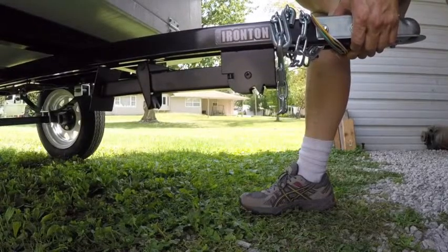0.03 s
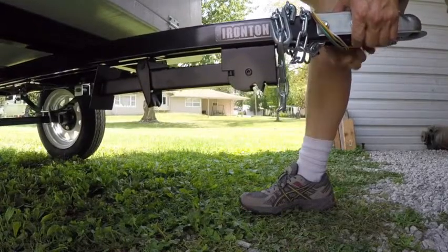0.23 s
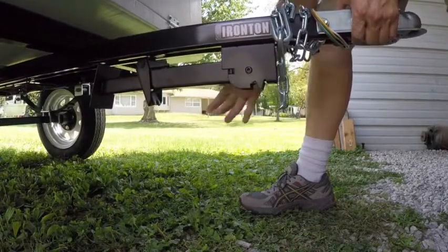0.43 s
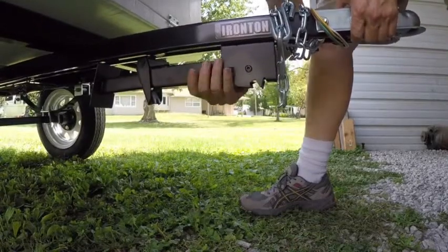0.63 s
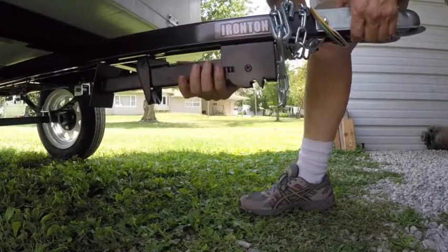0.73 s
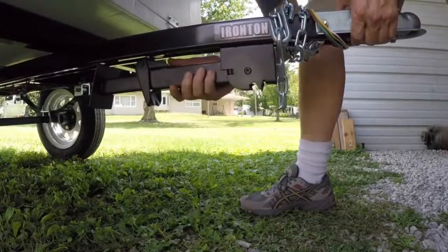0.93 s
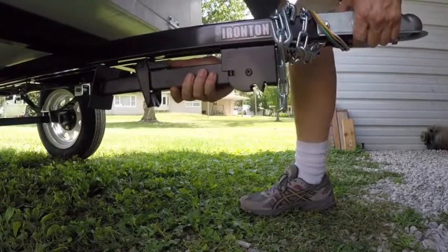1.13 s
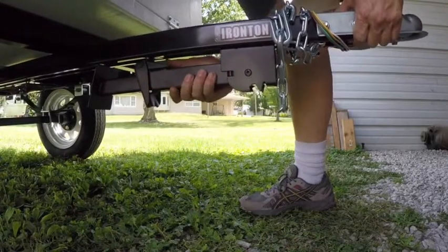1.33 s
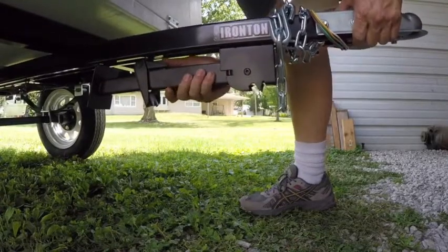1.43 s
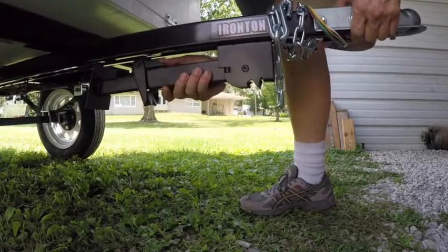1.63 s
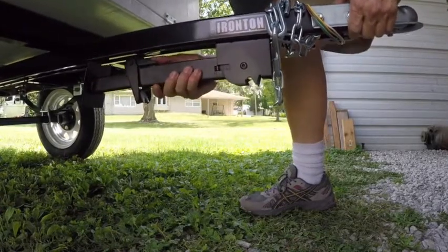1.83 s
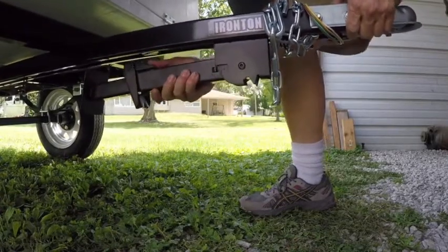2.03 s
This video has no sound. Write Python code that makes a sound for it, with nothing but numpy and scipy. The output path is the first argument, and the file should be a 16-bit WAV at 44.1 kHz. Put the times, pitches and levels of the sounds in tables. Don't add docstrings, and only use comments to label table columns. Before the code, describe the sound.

A sharp metal clank of a folding trailer jack comes at about 1.83 s: several blows within a tenth of a second, bright and rattling, with a deep frame boom and brief ringing to the end. Before it, quiet outdoor air, low traffic rumble, pulsing cicadas and thin high chirps; soft hand rubs, tiny steel ticks and dull nudges, mostly from 1.0 to 1.6 s. Close microphone.

```python
import sys
import numpy as np
from scipy import signal
from scipy.fft import rfft, irfft
from scipy.io import wavfile
from scipy.ndimage import uniform_filter1d

SR = 44100
rng = np.random.default_rng(int(sys.argv[2]) if len(sys.argv) > 2 else 0)


def generate_wav(sig):
    pcm = np.round(np.clip(np.atleast_2d(sig).T, -1, 1) * 32767).astype(np.int16)
    wavfile.write(sys.argv[1], SR, pcm)


def gain_from_db(level_db):
    decades = np.asarray(level_db, float) / 20
    return 10 ** decades


N = 91772


def level(x, db):
    return x * gain_from_db(db) / np.sqrt(np.mean(x ** 2))


def colour(x, points, tilt_db=0.):
    octave = np.log2(np.maximum(np.fft.rfftfreq(len(x), 1 / SR), 1))
    hz, db = np.array(points, float).T
    gain_db = np.interp(octave, np.log2(hz), db) + tilt_db * (octave - 10)
    return irfft(rfft(x) * gain_from_db(gain_db), len(x))


def ring(x, hz, t60):
    decay = np.log(1000) / (abs(t60) * SR)
    pole = np.exp(2j * np.pi * hz / SR - decay)
    return signal.lfilter([1], [1, -pole], x).imag


def fade(start, attack, t60):
    out = np.zeros(N)
    first = int(start * SR) + 1
    t = np.arange(first, N) / SR - start
    out[first:] = (1 - np.exp(-t / abs(attack))) * np.exp(-np.log(1000) * t / abs(t60))
    return out


def partial(start, hz, swell, t60, phase=0.):
    out = fade(start, swell, t60)
    first = int(start * SR)
    t = np.arange(first, N) / SR - start
    out[first:] *= np.sin(2 * np.pi * hz * t + phase)
    return out


def walk(rate):
    k = int(SR / rate)
    w = uniform_filter1d(uniform_filter1d(rng.standard_normal(N), k), k)
    return w / w.std()


def curve(rows, axis, end):
    r = np.array(rows, float)
    return np.interp(np.arange(N) / SR, np.append(r[:, 0], N / SR), np.append(r[:, axis], end))


# (time [s], level [dB], brightness [dB/octave], beam level [dB], beam brightness [dB/octave])
LATCH_BLOWS = [
    (1.832, -49, 1, -60, -3),
    (1.8331, -10, -1.5, -36, -15),
    (1.8400, -21, -1.5, -18, -2.5),
    (1.8744, -16, 0.5, -42, 0),
    (1.8881, -10.5, 1, -29, 4.5),
    (1.898, -26.5, -1, -25, -6),
    (1.9100, -29.5, -18, -27.5, 2),
]
# (frequency [Hz], level [dB], t60 [s])
TUBE_MODES = [(703, -13, 0.074), (955, -17, 0.06), (1258, 6.5, 0.038), (1458, -15, .05),
              (1599, -16.5, 0.13), (1806, -14.5, 0.079), (2200, -5, 0.018), (3028, 1.5, 0.02),
              (3840, -20, 0.037), (4250, -10, 0.038), (5050, -20.5, 0.052), (5694, -12.5, 0.034),
              (6720, -5, 0.011), (7900, -26, .04)]
# (frequency [Hz], level [dB], t60 [s])
BEAM_MODES = [(560, -19, 0.23), (401, -30.5, 0.47), (671.5, -16.5, 0.35), (788, -20.5, 0.46),
              (941, -23, 0.12), (1070, -4.5, 0.13), (1154, -8, 0.25), (1183.3, -9.5, 0.49),
              (1225, -11, 0.46), (1319, -24, 0.3), (1494, -15.5, 0.28), (1617, -23, 0.27),
              (2608, -10, 0.12), (3150, -14.5, 0.14)]
# (frequency [Hz], density [dB/Hz])
CRACK_COLOUR = [(300, -22.5), (600, -8), (1250, 3), (2000, -9.5), (3100, -8), (6000, -14.5), (8500, -22.5),
                (15000, -38.5)]
CONTACT_S, BEAM_SWELL_S, BEAM_ROUGH_DB = 0.0016, 0.0012, 3.0
CRACK_DB, CRACK_T60_S = -5.5, 0.069
RATTLE_DB, RATTLE_T60_S, RATTLE_TILT_DB = -9.5, 0.12, -4
ECHO_DB, ECHO_T60_S = -21.5, 0.42


def latch_blows():
    out = np.zeros(N)
    beam = [0] * len(BEAM_MODES)
    seat = 2 * np.pi * rng.random(len(TUBE_MODES))
    for s, db, tilt_db, beam_db, beam_tilt_db in LATCH_BLOWS:
        tube = 0
        for (hz, g, t60), phase in zip(TUBE_MODES, seat):
            tube = tube + gain_from_db(g + tilt_db * np.log2(hz / 1000)) * partial(s, hz, CONTACT_S, t60, phase)
        turn = 2 * np.pi * rng.random(len(BEAM_MODES))
        for i, (hz, g, t60) in enumerate(BEAM_MODES):
            gain = gain_from_db(g + beam_db + beam_tilt_db * np.log2(hz / 1000))
            beam[i] = beam[i] + gain * partial(s, hz, BEAM_SWELL_S, t60, turn[i])
        crack = level(colour(rng.standard_normal(N), CRACK_COLOUR, tilt_db), CRACK_DB)
        crack = crack * fade(s, 0.0011, CRACK_T60_S) * gain_from_db(2.5 * walk(500))
        shake = gain_from_db(RATTLE_DB) * fade(s, 0.0091, RATTLE_T60_S)
        echo = gain_from_db(ECHO_DB) * fade(s, 0.039, ECHO_T60_S)
        rattle = level(colour(rng.standard_normal(N), CRACK_COLOUR, RATTLE_TILT_DB), 0) * (shake + echo)
        out += gain_from_db(db) * (tube + crack + rattle)
    return out + sum(b * gain_from_db(BEAM_ROUGH_DB * walk(61)) for b in beam)


# (time [s], level [dB], t60 [s])
FREED_PARTS = [(1.896, -19, 0.16), (1.9, -25.5, 0.23), (1.907, -51, 0.33), (1.889, -43, .3),
               (1.915, -65, .6), (1.9, -41, 0.63), (1.875, -36.5, 0.41), (1.895, -36, .2),
               (1.955, -37, .25), (1.9, -33, 0.29), (2.1, -40, .12), (1.889, -47, .2), (1.9, -27, 0.19)]
FREED_PITCHES = [694, 634, 6520, 2616, 4320, 1200, 298, 325, 290, 752, 4980, 3220, 1250]


def freed_parts():
    out = np.zeros(N)
    for (s, db, t60), hz in zip(FREED_PARTS, FREED_PITCHES):
        out += gain_from_db(db + 2.5 * walk(60)) * partial(s, hz, BEAM_SWELL_S, t60)
    return out


# (time [s], level [dB])
SHOVES = [
    (1.832, -13.5),
    (1.876, -11),
    (1.889, -19),
    (1.904, -20.5),
]
# (frequency [Hz], level [dB], t60 [s], swell [s])
FRAME_MODES = [(60.56, -7, 0.55, 0.025), (99.46, -5, 0.73, 0.021), (123, -18, 1, 0.019),
               (140, 9, 0.21, 0.03), (169.9, -7.5, 0.25, 0.012), (237, -33, 0.35, 0.022)]
# (time [s], level [dB], frequency [Hz], t60 [s])
GRIP_NUDGES = [(0.499, -28, 49.6, 0.1), (0.76, -33.5, 99, 0.26), (0.821, -37.5, 98.6, 0.15),
               (1.17, -34, 91.3, 0.33), (1.263, -26.5, 96.2, 0.19), (1.268, -50, 131, 0.081),
               (1.437, -34.5, 68.3, 1), (1.527, -25.5, 98, 0.18), (1.537, -32, 136, 0.2),
               (1.599, -30.5, 97.7, 0.19), (1.614, -32, 140, 0.16)]


def frame():
    out = np.zeros(N)
    for s, db in SHOVES:
        for hz, g, t60, swell in FRAME_MODES:
            out += gain_from_db(db + g) * partial(s, hz, swell, t60)
    for s, db, hz, t60 in GRIP_NUDGES:
        out += gain_from_db(db) * partial(s, hz, 0.0062, t60)
    return out


# (time [s], level [dB], frequency [Hz], t60 [s])
TICKS = [(0.28, -74, 7500, 0.035), (.698, -54.5, 3020, 0.017), (1.045, -52, 2200, 0.022),
         (1.046, -54, 4200, 0.033), (1.08, -50.5, 724, 0.024), (1.149, -53, 1670, .02),
         (1.12, -41.5, 1540, 0.026), (1.244, -47, 1190, 0.031), (1.439, -51, 1880, 0.017),
         (1.449, -41.5, 1710, 0.0086), (1.476, -53, 1020, 0.21), (1.564, -56, 2200, 0.22),
         (1.573, -41.5, 727, 0.059)]
TICK_CLICK_DB = 3


def ticks():
    out = np.zeros(N)
    for s, db, hz, t60 in TICKS:
        push = rng.standard_normal(N) * fade(s, 0.0003, 0.0034)
        push = push / np.sqrt(np.sum(push ** 2))
        click = colour(push, [(hz / 4, -16), (hz, -2), (hz * 2, -13), (hz * 3.3, -17), (hz * 5.9, -34)])
        modes = partial(s, hz, 0.00037, t60) + 0.39 * partial(s, hz * 0.85, 0.00057, t60)
        out += gain_from_db(db) * (modes + gain_from_db(TICK_CLICK_DB) * 10 * click)
    return out


# (time [s], attack [s], release [s], level [dB], tilt [dB/octave])
RUBS = [
    (.02, 0.19, 0.35, -58, -5),
    (0.328, 0.022, 0.029, -57, -1.5),
    (0.698, 0.0062, 0.19, -60.5, -1),
    (.83, 0.08, 0.045, -57.5, 3),
    (1.043, 0.0015, 0.0063, -59, -1.5),
    (1.118, .002, 0.038, -53, -5),
    (1.241, 0.0019, 0.036, -45.5, -6),
    (1.437, 0.0043, 0.028, -56, -3.5),
    (1.468, 0.008, 0.012, -47, -3.5),
    (1.562, 0.0031, 0.027, -46.5, -2.5),
]
RUB_GRAIN_DB = -0.5


def rubs():
    out = np.zeros(N)
    t = np.arange(N) / SR
    for s, attack, release, db, tilt_db in RUBS:
        shape = np.clip((t - s) / attack, 0, 1) * np.exp(-np.maximum(t - s - attack, 0) / release)
        grain = rng.standard_normal(N) * gain_from_db(RUB_GRAIN_DB * walk(400))
        out += shape * level(colour(grain, [(300, -26), (900, -6.5), (16000, -17.5)], tilt_db), db)
    return out


def resonate(x, hz, width_hz):
    turn = np.exp(2j * np.pi * np.cumsum(hz + 30 * walk(340)) / SR)
    pole = [1, -np.exp(-np.pi * width_hz / SR)]
    smooth = signal.lfilter([1], pole, signal.lfilter([1], pole, x / turn))
    return level((smooth * turn).imag, 0)


def stridulate(rate, hz, width_hz, blur, jitter):
    phase = np.cumsum(rate * (1 + jitter * walk(40))) / SR
    clicks = (np.diff(np.floor(phase), prepend=0) > 0) * gain_from_db(1.6 * rng.standard_normal(N))
    return resonate(clicks + blur * rng.standard_normal(N), hz, width_hz)


# (time [s], level
# [dB], start frequency [Hz])
SYLLABLES = [(0.029, -65, 4450), (0.082, -51, 4680), (0.141, -53, 4650), (0.192, -56.5, 4600),
             (0.252, -65, 4700), (0.569, -65, 4460), (0.747, -50.5, 4790), (0.791, -52, 4770),
             (0.849, -52, 4700), (0.901, -65, 4700), (0.984, -65, 4350), (1.04, -67, 4304),
             (1.105, -68, 4360), (1.492, -59, 4600), (1.529, -51.5, 4700), (1.578, -52, 4780),
             (1.631, -54.5, 4650), (1.674, -64, 4750), (1.76, -64, 4400), (1.81, -61.5, 4250)]
SYLLABLE_SAG_HZ_PER_S, SYLLABLE_T60_S = 3000, 0.33


def calling_cicadas():
    t = np.arange(N) / SR
    starts, _, start_hz = np.array(SYLLABLES).T
    now = np.maximum(np.searchsorted(starts, t) - 1, 0)
    since = np.clip(t - starts[now], 0, 0.1)
    effort = sum(gain_from_db(db) * fade(s, 0.0086, SYLLABLE_T60_S) * (t < s + 0.07) for s, db, _ in SYLLABLES)
    hz = start_hz[now] - SYLLABLE_SAG_HZ_PER_S * since
    song = stridulate(228, hz, width_hz=330, blur=0.045, jitter=0.02)
    return uniform_filter1d(effort, size=200) * song


# (time [s], level [dB], frequency [Hz])
FAR_CICADAS = [
    (0.0, -66.5, 4480),
    (.27, -66, 4650),
    (.45, -67, 4800),
    (.58, -68, 4220),
    (.75, -68.5, 4500),
    (1.0, -69.5, 4250),
    (1.15, -69, 4400),
    (1.3, -75, 4660),
    (1.51, -69, 4390),
    (1.82, -72, 4500),
]
FAR_THROB_RATE, FAR_THROB_DB = 54, 6


def far_cicadas():
    t = np.arange(N) / SR
    song = resonate(rng.standard_normal(N), curve(FAR_CICADAS, axis=2, end=4440), width_hz=740)
    throb_db = FAR_THROB_DB * np.sin(2 * np.pi * FAR_THROB_RATE * t)
    return song * gain_from_db(curve(FAR_CICADAS, axis=1, end=-70.5) + throb_db)


# (time [s], length [s], level [dB])
CHIRPS = [
    (0.137, 0.04, -62.5),
    (0.317, 0.034, -61),
    (0.708, 0.057, -62),
    (0.884, 0.053, -63),
    (1.075, 0.056, -64.5),
    (1.272, 0.055, -66),
    (1.479, 0.048, -63),
    (1.666, 0.069, -66),
]
KATYDID_HZ = 8320


def katydids():
    t = np.arange(N) / SR
    gate = 0
    for s, length, db in CHIRPS:
        gate = gate + gain_from_db(db) * np.clip((t - s) / 0.0096, 0, 1) * np.clip(1.4 - (t - s) / length, 0, 1)
    chirps = gate * stridulate(130, KATYDID_HZ, width_hz=240, blur=0.072, jitter=0.09)
    chorus = level(ring(rng.standard_normal(N), KATYDID_HZ * 1.027, 0.0054), -74.5)
    return chirps + chorus * gain_from_db(2.0 * walk(41))


# (frequency [Hz], density [dB/Hz])
AIR_COLOUR = [(200, -4), (400, -16.5), (570, -8), (740, -9.5), (1050, -20.5), (1500, -26.5), (6500, -33.5),
              (15000, -43)]


def air():
    noise = colour(rng.standard_normal(N), [(120, -77)] + list(AIR_COLOUR))
    out = np.zeros(N)
    for hz in 250 * 2. ** np.arange(7):
        octave = [(hz / 2, -40), (hz / 1.463, -6), (hz, 0), (hz * 1.565, -6), (hz * 2, -40)]
        out += gain_from_db(0.17 * walk(15)) * colour(noise, octave)
    return level(out, -57.5)


# (time [s], level [dB])
RUMBLE_SWELL = [
    (0.0, -48.5),
    (1.508, -43.5),
    (1.8, -44),
]
# (frequency [Hz], density [dB/Hz])
RUMBLE_COLOUR = [(8.8, -13), (15, 2), (87, 2), (102, 0.5), (118, -7.5), (188, -6), (215, -35), (260, -19),
                 (340, -24.5), (570, -120)]


def rumble():
    noise = level(colour(rng.standard_normal(N), list(RUMBLE_COLOUR) + [(600, -130)]), 0)
    return noise * gain_from_db(curve(RUMBLE_SWELL, axis=1, end=-45) + 1.5)


def scene():
    jack = latch_blows() + freed_parts() + frame()
    hands = ticks() + rubs()
    insects = calling_cicadas() + far_cicadas() + katydids()
    return (jack + hands + insects + air() + rumble())[None]


def band_limit(x):
    return signal.sosfilt(signal.butter(12, 16030, fs=SR, output="sos"), x)


def record(dry):
    soft = np.tanh(1.29 * dry) / 1.287
    top_cut = signal.ellip(8, 0.2, 70, 15450, fs=SR, output="sos")
    mix = signal.sosfilt(top_cut, soft)
    return band_limit(mix)


dry = scene()
out = record(dry)
generate_wav(out)
```